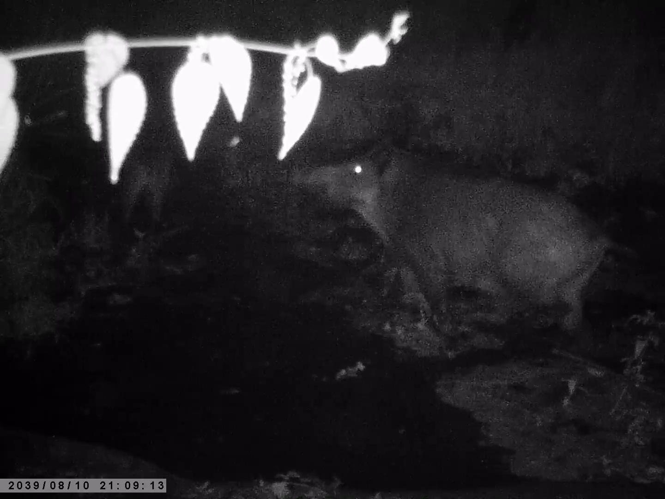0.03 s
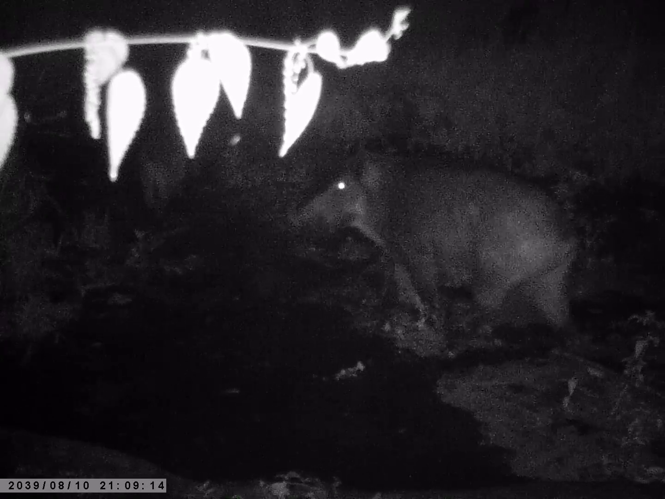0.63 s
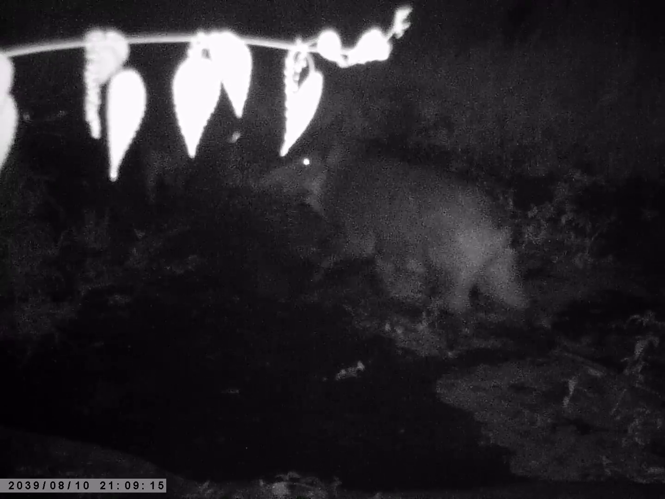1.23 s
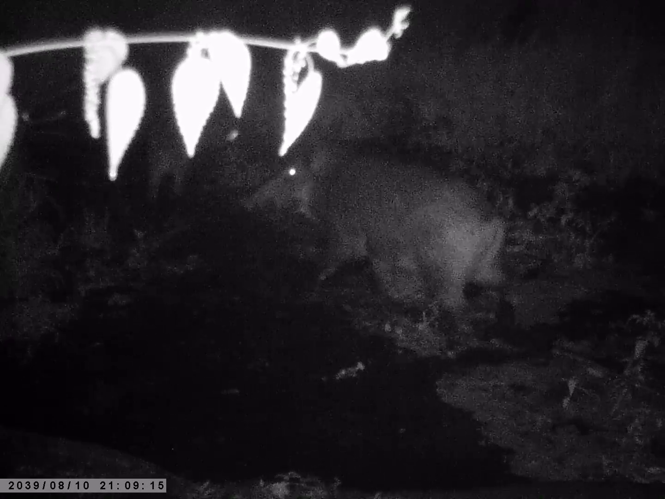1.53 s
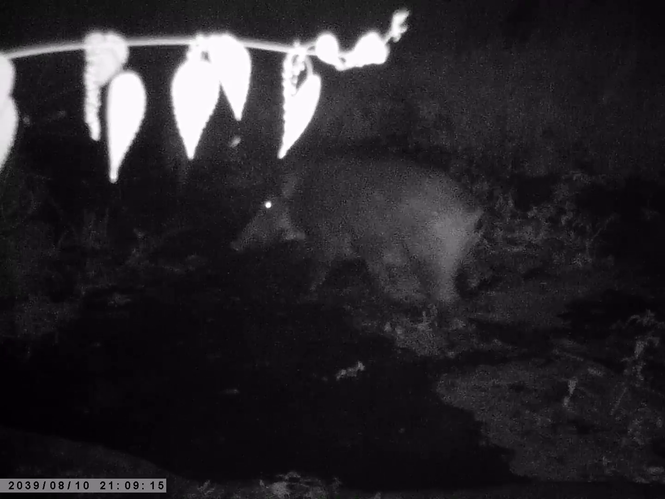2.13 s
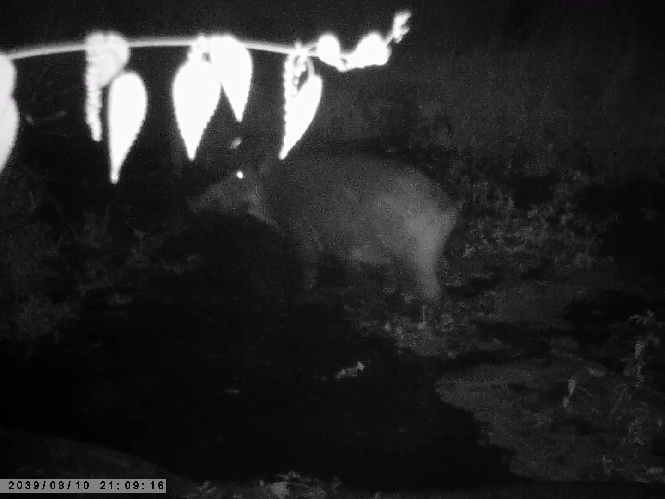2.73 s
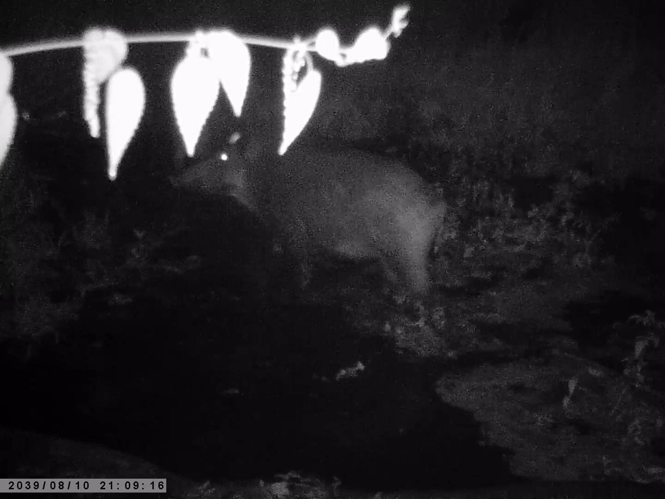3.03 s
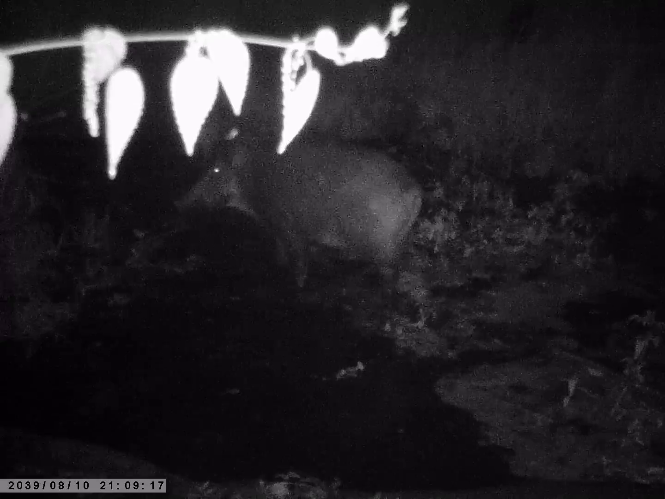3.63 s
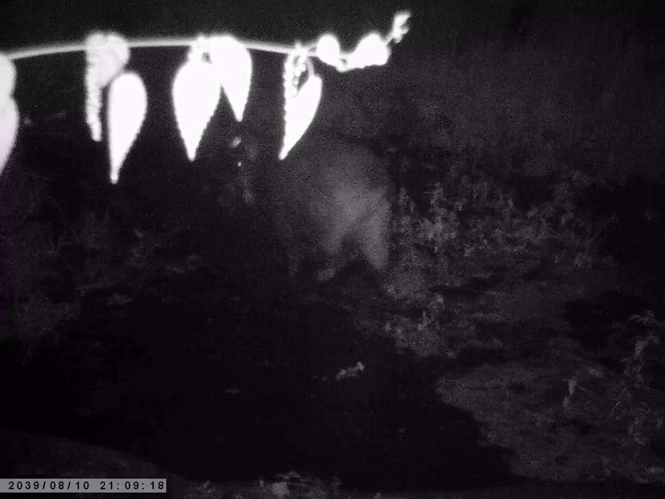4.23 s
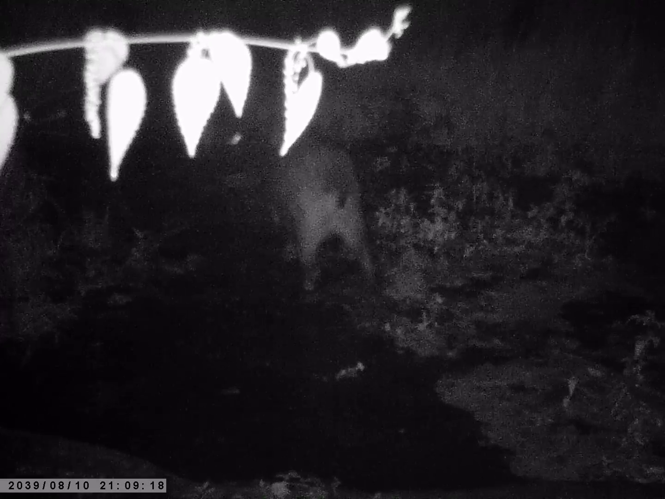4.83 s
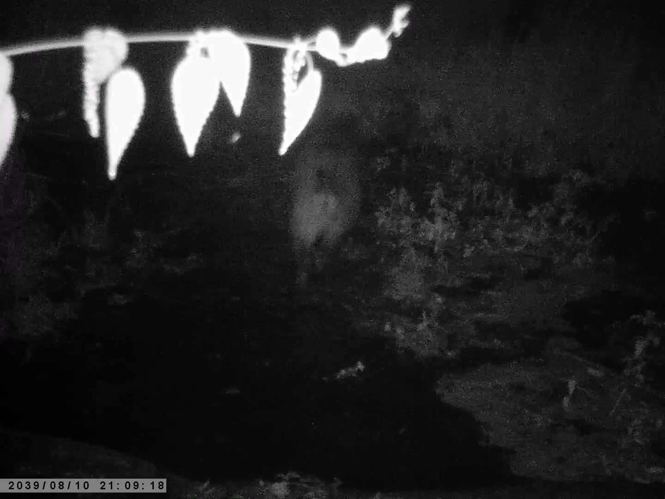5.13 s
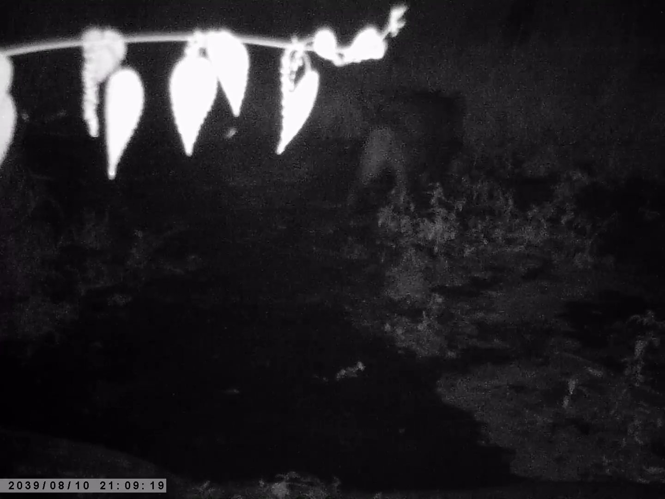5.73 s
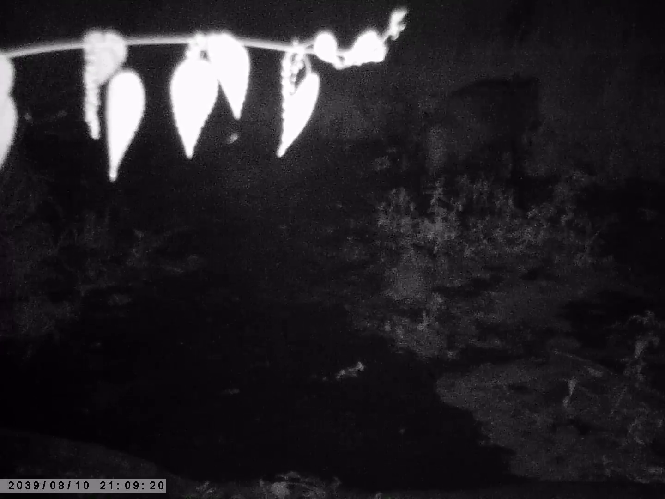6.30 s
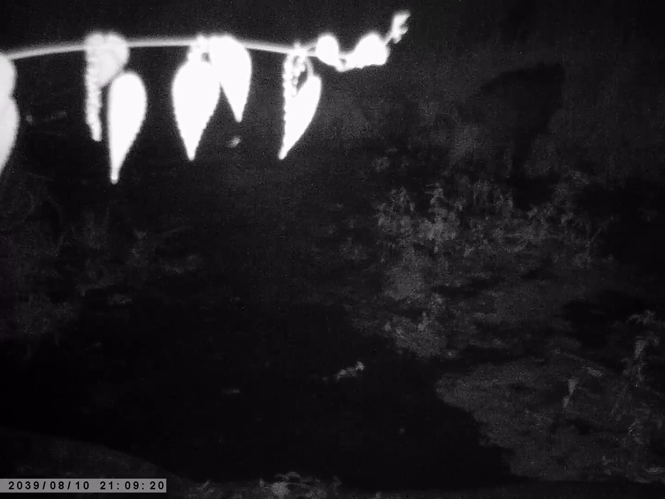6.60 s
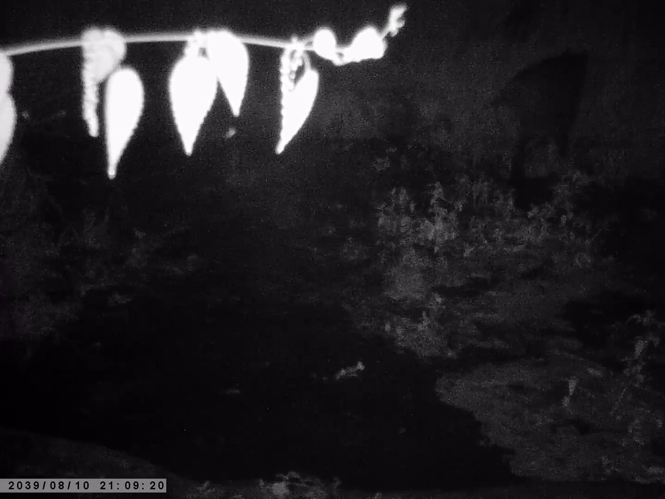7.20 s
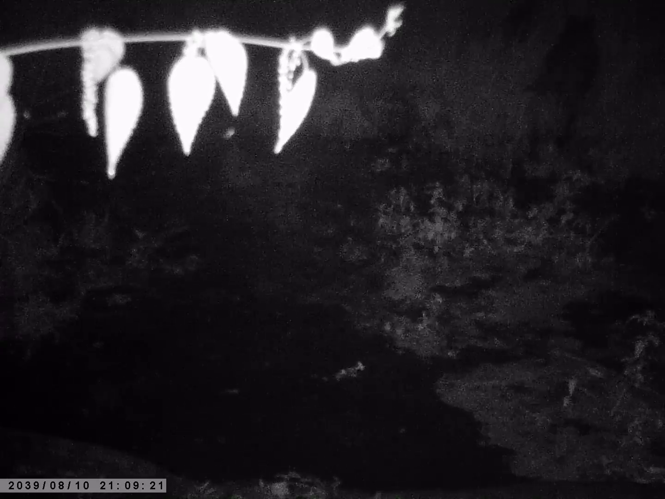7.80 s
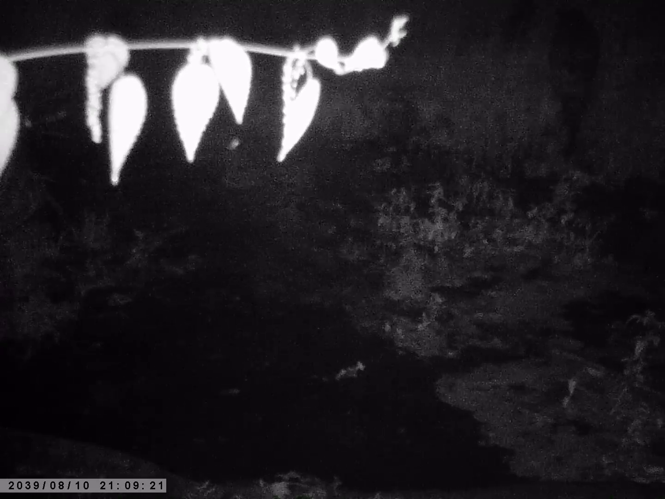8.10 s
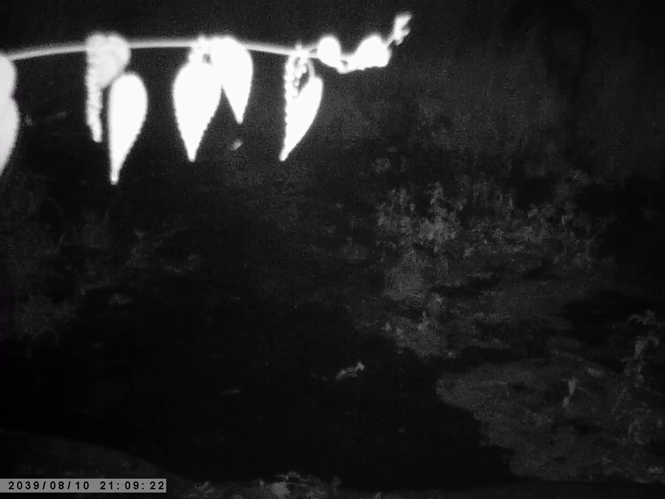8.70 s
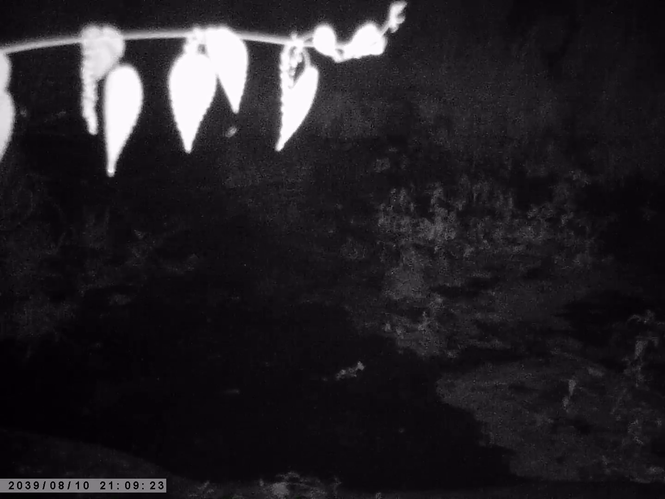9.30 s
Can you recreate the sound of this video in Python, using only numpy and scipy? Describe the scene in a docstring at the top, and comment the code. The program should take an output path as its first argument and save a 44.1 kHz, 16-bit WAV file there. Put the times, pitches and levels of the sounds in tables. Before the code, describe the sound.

A wild boar wades through a shallow marsh at night, some metres away. A faint steady hiss, a low rumble and very high rasping crickets run throughout. At about 0.4 seconds the boar gives one soft, short snort. Until about 5 seconds its hooves squelch irregularly in the mud, with small wet pops, ringing bubbles, drips and an occasional light crack; a dull thud falls near 1.3 seconds. From 5 seconds it hurries, and this is the loudest stretch: a heavy, thudding step at 5.4, quick squelches and sharp cracks of stems and spray until about 7.2, with water churning most around 6. Reeds rustle softly against its body from 5 seconds on. After 7.2 the wet steps weaken, with a thud near 7.9 and a softer one near 8.7, while dry leaves give fine, high swishes until the end at about 9.4 seconds.

```python
"""In a shallow marsh at night, a wild boar wades by some metres away.
Its hooves squelch in the mud and trap air, which rings as bubbles; water drips from its body.
It snorts once, hurries up the bank and pushes off through tall reeds that rustle and crack.
Bush crickets rasp in the grass; a trail camera's hiss and a low rumble lie under everything."""
import sys
import numpy as np
from scipy import signal
from scipy.fft import rfft, irfft, next_fast_len
from scipy.io import wavfile
from scipy.ndimage import uniform_filter1d

SR = 44100
rng = np.random.default_rng(int(sys.argv[2]) if len(sys.argv) > 2 else 0)


def generate_wav(signal):
    """Clip the signal to [-1, 1] and save it as 16-bit WAV at the path in sys.argv[1]."""
    frames = np.transpose(np.atleast_2d(signal))
    scaled = np.clip(frames, -1, 1) * 32767
    pcm = np.round(scaled).astype(np.int16)
    wavfile.write(sys.argv[1], SR, pcm)


N = 412335
TIME = np.arange(N) / SR

# Levels in the tables are relative: the functions add their own gains.
# tone colour of the hiss: f/Hz, level/dB
HISS_COLOUR = [(150, -9), (250, 1), (400, -5.5), (700, -4.5), (1100, -5), (2500, -4), (5000, -12),
               (8000, -44), (12000, -24), (14200, -9), (15300, -33), (15800, -42)]
# tone colour of the rumble: f/Hz, level/dB
RUMBLE_COLOUR = [(15, 0), (30, -6.5), (55, -4.5), (110, -14), (170, -20.5), (250, -26.5), (400, -33.5)]
# how the rumble swells and sinks: t/s, level/dB
RUMBLE_LEVELS = [(0, -51), (.85, -52), (1.2, -48.5), (1.7, -51), (2.2, -50), (4.6, -51), (5.35, -49),
                 (6.25, -46.5), (6.9, -50), (7.6, -49), (8.7, -50), (9.35, -50.5)]
# tone colour of the bush crickets: f/Hz, level/dB
CRICKET_COLOUR = [(6500, -1.5), (8000, 0), (9000, 4), (9700, 8), (10500, 9), (11300, 3), (12300, -3),
                  (14000, -13)]
# how hard the legs stir the water: t/s, level/dB
WADING_LEVELS = [(0, -61), (1.0, -61), (1.6, -59.5), (2.0, -61), (2.6, -61.5), (2.79, -57), (3.04, -61.5),
                 (4.1, -61), (4.75, -62), (5.08, -57.5), (5.55, -53.5), (6.1, -45.5), (6.33, -48),
                 (6.42, -53.5), (6.5, -50), (6.6, -53.5), (7.24, -59.5), (7.85, -60.5), (8.04, -55),
                 (8.4, -62), (9.35, -62)]
# tone colour of small bubbles near the surface: f/Hz, level/dB
CHURN_COLOUR = [(400, -28), (700, -7), (1100, 0), (1800, 4), (2800, 1), (4000, -3), (6000, -18),
                (9000, -48)]
# tone colour of larger bubbles below: f/Hz, level/dB
GURGLE_COLOUR = [(200, -44), (300, -2.5), (420, -2.5), (650, 0), (1000, -3)]
# a leg sweeps through deep water: t/s, level/dB, length/s
LEG_SWEEPS = [(1.19, -76, 0.66), (2.73, -57.5, 0.11), (5.34, -56, 0.29), (5.687, -44, 0.15),
              (6.088, -51.5, 0.22), (7.84, -59, 0.26)]
# the breath of one snort: t/s, level/dB
SNORT_LEVELS = [(.33, -79), (.38, -55.5), (.47, -52), (.51, -55), (.56, -74)]
# tone colour of air in the snout: f/Hz, level/dB
SNOUT_COLOUR = [(150, -18), (300, -7.5), (450, -8.5), (800, -16.5), (1500, -14), (2400, -20.5),
                (3050, -13.5), (4000, -21), (5900, -20.5), (7200, -25), (9000, -33)]
# dry leaves swish on the bank: t/s, level/dB
LEAF_LEVELS = [(6.8, -90), (7.23, -76), (7.28, -58), (7.45, -70), (7.57, -75), (7.63, -58), (7.76, -74),
               (7.95, -67), (8.13, -52), (8.35, -57), (8.4, -68.5), (8.64, -65), (8.7, -55), (8.82, -53),
               (8.9, -62), (8.98, -49), (9.13, -53.5), (9.22, -67), (9.35, -72)]
# how hard reeds brush the boar's sides: t/s, level/dB
REED_LEVELS = [(4.85, -60.5), (5.1, -58.5), (5.25, -60), (5.41, -56.5), (5.61, -57), (5.7, -56),
               (6.0, -56.5), (6.36, -57.5), (6.42, -56), (6.5, -57.5), (6.66, -59), (6.8, -59.5),
               (7.05, -58), (7.22, -60), (7.3, -59), (7.55, -60), (7.8, -60), (8.15, -57.5), (8.36, -57),
               (8.4, -59.5), (8.63, -60), (8.71, -57), (8.81, -57), (8.9, -59), (9.0, -58), (9.14, -58),
               (9.22, -60), (9.35, -59.5)]
# tone colour of sliding reed leaves: f/Hz, level/dB
REED_COLOUR = [(1200, -8), (2500, -0.5), (4000, 2), (6000, 3), (8000, 0.5), (11000, -1), (14000, -13),
               (16000, -28)]
# stems crack and spray bursts: t/s, level/dB, fade time/s
SHARP_CRACKS = [(0.228, -41, .0083), (0.387, -36.5, 0.025), (1.391, -37, .061), (1.902, -39.5, 0.048),
                (1.9247, -33, 0.053), (2.257, -41, .012), (3.387, -35.5, 0.028), (3.436, -39.5, .02),
                (4.512, -40, .04), (4.6047, -39, .02), (5.0577, -31.5, 0.033), (5.1196, -28, .076),
                (5.3608, -23.5, 0.058), (5.498, -24.5, 0.035), (5.511, -33, .06), (5.642, -27, 0.057),
                (5.674, -39, .067), (5.9065, -35, .042), (6.0207, -22.5, 0.052), (6.302, -29, .048),
                (6.4374, -34.5, 0.055), (6.466, -39, 0.035), (6.886, -33, 0.034), (7.1, -24.5, 0.026)]
# dull thuds and soft low bumps, some under the hooves: t/s, level/dB, f/Hz, fade time/s
LOW_THUDS = [(1.24, -50, 216, 0.06), (1.331, -30.5, 92, 0.13), (1.36, -48.5, 306, 0.23),
             (1.44, -40, 126, 0.082), (1.595, -45, 150, .06), (5.325, -39, 113, 0.2),
             (5.362, -22, 123, 0.063), (5.365, -22, 454, 0.052), (5.378, -26, 54.6, 0.16),
             (6.75, -33.5, 230, 0.1), (7.855, -27.5, 138, 0.16), (7.864, -39, 424, 0.12),
             (7.90, -37, 134, 0.14), (8.67, -39, 149, 0.21), (8.668, -47, 325, 0.45),
             (8.74, -52, 297, 0.32)]
# single bubbles ring as hooves squelch and drops fall: t/s, level/dB, starting f/Hz
PLOPS = [(.591, -58, 1110), (.733, -46.5, 1770), (.86, -52, 2400), (.926, -49, 1790), (1.206, -32, 2440),
         (2.002, -53, 2500), (2.276, -45, 1710), (2.527, -49, 2600), (2.68, -44, 3400), (2.722, -43, 2450),
         (2.745, -47, 2400), (2.764, -42, 2400), (2.772, -43, 910), (2.7843, -35, 1215), (2.809, -47, 1210),
         (2.828, -43.5, 4250), (2.879, -43, 1520), (2.896, -50.5, 1700), (2.911, -42, 2370),
         (2.917, -49, 1600), (3.124, -40.5, 3000), (3.295, -48, 2700), (3.34, -39.5, 2740),
         (3.394, -47, 1800), (3.993, -35.5, 2520), (4.054, -50, 1950), (4.145, -51, 1200),
         (4.352, -51.5, 1140), (4.369, -40.5, 1760), (4.372, -36.5, 3270), (4.487, -43, 2000),
         (4.909, -42, 1410), (4.966, -41, 1170), (5.026, -46.5, 940), (5.129, -26.5, 1700),
         (5.328, -31, 1090), (5.386, -30, 1610), (5.449, -43, 1350), (5.518, -39.5, 534),
         (5.563, -28, 2640), (5.678, -30.5, 2800), (5.728, -37, 640), (5.746, -40, 483), (5.766, -28, 814),
         (5.783, -40, 560), (5.817, -40, 950), (5.85, -32, 346), (5.853, -36.5, 1450), (5.88, -39, 1800),
         (5.943, -35, 1850), (5.993, -37, 800), (6.082, -24.5, 1790), (6.132, -38.5, 500),
         (6.178, -36, 1850), (6.157, -36.5, 785), (6.18, -42.5, 412), (6.218, -31.5, 1084),
         (6.261, -36, 1510), (6.286, -30.5, 2400), (6.361, -53, 1330), (6.494, -35, 767), (6.621, -51, 475),
         (6.663, -40, 1810), (6.676, -41.5, 1450), (6.944, -42, 1610), (7.112, -25.5, 4900),
         (7.152, -29, 868), (7.179, -41, 1110), (7.62, -42, 900), (7.626, -33.5, 2410), (7.869, -41, 1980),
         (7.938, -37.5, 2310), (7.972, -43, 770), (8.015, -42.5, 855), (8.085, -36.5, 2150),
         (8.103, -45, 950), (8.164, -39, 1520), (8.187, -41, 2230)]
# short wet pops of mud, hooves and falling drops: t/s, level/dB, f/Hz of the hollow
WET_SMACKS = [(.2295, -35, 3430), (1.0353, -44, 3200), (1.2217, -37, 1600), (1.2392, -32.5, 1060),
              (1.2435, -33, 1720), (1.2478, -39, 1300), (1.5063, -41, 1800), (1.8324, -37.5, 3000),
              (1.8545, -44, 2700), (1.9311, -34, 3340), (2.2578, -34.5, 2740), (2.2765, -40, 2010),
              (2.392, -42, 1310), (2.7133, -32, 1870), (2.7224, -39, 2400), (2.7296, -28.5, 2500),
              (2.757, -44, 1010), (2.7853, -33, 1200), (2.8151, -39, 1700), (2.957, -46, 1290),
              (3.0612, -43, 3420), (3.158, -41, 4500), (3.2488, -41, 2680), (3.283, -38, 3100),
              (3.4352, -37, 3480), (3.4389, -43, 1700), (3.8838, -40, 3400), (4.0524, -40, 2320),
              (4.3724, -34, 3320), (4.5095, -38, 2380), (4.5274, -38, 4200), (4.5802, -47, 2000),
              (4.6061, -35.5, 3300), (4.6204, -43, 2500), (5.122, -22, 3070), (5.3716, -35, 910),
              (5.3886, -22, 1670), (5.4329, -35, 2500), (5.4991, -24, 5000), (5.5133, -26, 5300),
              (5.5645, -26, 3200), (5.5734, -30, 2200), (5.6448, -22, 4900), (5.6485, -24.5, 2600),
              (5.6794, -28, 2860), (6.0145, -26, 1500), (6.0232, -26, 5460), (6.2175, -31, 2780),
              (6.4386, -36, 1290), (6.466, -33, 1690), (6.4758, -17.5, 4040), (6.4978, -23, 2270),
              (6.5599, -23, 3740), (6.6255, -32, 4500), (7.0527, -36, 3720), (7.0746, -32, 1290),
              (7.0953, -26, 2850), (7.0995, -19.5, 3000), (7.1028, -32, 2700), (7.1123, -22, 3370),
              (7.387, -37, 2520), (7.4518, -39, 2500), (7.531, -46.5, 1430), (8.012, -38, 2700),
              (8.0417, -41, 1200), (8.06, -40, 2800), (8.0765, -37, 4000), (8.146, -35, 3500),
              (8.2207, -38.5, 1700)]
# tone colour of pops in closing mud: f/Hz, level/dB
MUD_POP_COLOUR = [(420, 3), (1500, -7), (5200, -6)]
# a hoof sinks in or pulls free: t/s, level/dB, f/Hz of the hollow, rise time/s, fade time/s
HOOF_SQUELCHES = [(.227, -45, 3130, .002, 0.015), (.66, -46.5, 2470, .005, .06),
                  (.715, -45, 2750, .015, 0.044), (1.005, -52, 2980, .005, .05),
                  (1.029, -46, 3320, .005, 0.12), (1.057, -45, 2250, .005, 0.068),
                  (1.106, -42.5, 1830, .005, 0.1), (1.202, -38, 2600, .007, .06),
                  (1.221, -38, 1520, .003, .05), (1.236, -37, 1190, .008, 0.063),
                  (1.26, -46.5, 1800, .003, .15), (1.33, -52, 950, .06, .25), (1.5, -45.5, 1790, .006, .06),
                  (1.545, -48, 2460, .01, .05), (1.596, -44.5, 1820, .006, 0.16),
                  (1.64, -50.5, 2200, .04, .2), (1.816, -41, 1780, .012, 0.056),
                  (1.843, -43, 520, .004, .05), (1.843, -39, 1860, .011, 0.054),
                  (1.922, -34, 3200, .006, .04), (2.257, -46, 2260, .001, .05),
                  (2.275, -43, 2300, .003, 0.064), (2.373, -45, 1300, .006, 0.07),
                  (2.64, -49, 2110, .003, .06), (2.675, -42.5, 2370, .045, 0.099),
                  (2.755, -52.5, 2200, .01, 0.046), (2.77, -43, 1110, 0.011, 0.088),
                  (2.808, -43, 2100, .008, .07), (2.842, -41, 1100, .004, .04),
                  (3.053, -49, 3000, .009, .06), (3.248, -39.5, 2190, .001, 0.07),
                  (3.279, -48, 2820, .004, .07), (3.435, -49, 2220, .003, 0.026),
                  (3.6, -48.5, 2160, .005, 0.27), (3.747, -47.5, 2470, .004, 0.065),
                  (3.883, -46, 2500, .004, 0.063), (3.972, -44, 2270, .018, 0.1),
                  (4.348, -40, 2700, .022, 0.043), (4.462, -46.5, 2600, .011, 0.036),
                  (4.502, -47, 2450, .008, .07), (4.578, -43.5, 1770, .003, 0.032),
                  (4.605, -39, 2600, .002, 0.049), (4.903, -38, 1340, .006, .1),
                  (4.934, -36.5, 1410, .009, 0.099), (5.095, -43, 2380, .01, 0.089),
                  (5.12, -34, 2050, .009, 0.27), (5.293, -29.5, 1500, .034, 0.16),
                  (5.36, -26, 1580, .01, 0.04), (5.379, -25.5, 1850, .008, 0.03),
                  (5.43, -35, 2600, .003, .03), (5.498, -34.5, 2230, .015, 0.23),
                  (5.552, -34.5, 3020, .011, .04), (5.64, -27, 3000, .006, 0.02),
                  (5.668, -30.5, 2870, .012, 0.084), (5.775, -39, 1980, .01, .1),
                  (5.906, -32, 2640, .004, .1), (5.98, -30.5, 2860, .009, 0.14),
                  (6.003, -27, 1740, .014, 0.09), (6.062, -40, 1610, .02, .06),
                  (6.15, -36.5, 1510, .028, 0.089), (6.216, -33, 2000, 0.0032, .06),
                  (6.238, -41, 2500, .006, .06), (6.271, -37, 2480, .017, 0.11),
                  (6.432, -33, 1630, .007, 0.1), (6.462, -28.5, 1910, .006, 0.046),
                  (6.473, -26, 3000, .003, .05), (6.493, -38, 2060, .004, 0.043),
                  (6.61, -36.5, 523, .003, 0.042), (6.737, -37, 1800, .005, .06),
                  (6.771, -36.5, 800, .006, 0.037), (6.813, -35.5, 2420, .022, 0.082),
                  (6.882, -28.5, 2210, .005, .025), (7.072, -37.5, 1490, .004, .07),
                  (7.096, -33, 2900, .007, 0.13), (7.158, -36.5, 2960, .011, .04),
                  (7.358, -36.5, 2200, .029, 0.1), (7.447, -46, 2470, .005, 0.027),
                  (7.577, -44, 2450, .009, 0.048), (7.607, -37.5, 2600, .02, 0.16),
                  (7.866, -38.5, 1930, .015, 0.24), (7.905, -44.5, 2300, .015, .08),
                  (7.991, -42, 1630, .006, .07), (8.072, -41.5, 2300, .016, 0.25),
                  (8.18, -45, 2300, .009, 0.05), (8.571, -38.5, 3000, .002, .025)]


def from_db(db):
    """Turn decibels into a factor to multiply a sound by."""
    return 10 ** (np.asarray(db) / 20)


def rms_one(x):
    """Scale a sound so that its average strength (rms) is 1."""
    return x / np.sqrt(np.mean(x ** 2) + 1e-20)


def in_time(rows):
    """Join (time, level) points with straight lines, giving a level for every sample."""
    times, levels = np.transpose(rows)
    return np.interp(TIME, times, levels)


def at_hz(colour, hz):
    """Look up the gain of a tone colour at a given frequency."""
    f, db = np.transpose(colour)
    return from_db(np.interp(np.log(np.maximum(hz, 1)), np.log(f), db))


def coloured_noise(colour):
    """Steady noise with a given tone colour, falling away beyond the table's ends."""
    size = next_fast_len(N)
    hz = np.arange(size // 2 + 1) * SR / size
    ends = np.minimum(hz / colour[0][0], 1) ** 2 / np.maximum(hz / colour[-1][0], 1) ** 2
    spectrum = rfft(rng.standard_normal(size)) * at_hz(colour, hz) * ends
    return rms_one(irfft(spectrum, size)[:N])


def drift(rate):
    """A random wander around zero that heads for a new value `rate` times a second."""
    return np.interp(TIME * rate, np.arange(N), rng.standard_normal(N))


def band(x, low_hz, high_hz, order=2):
    """Keep what lies between two frequencies; a higher order gives sharper edges."""
    edges = np.clip([low_hz, high_hz], [10, 20], [.4 * SR, .45 * SR])
    return signal.sosfilt(signal.butter(order, edges, "band", fs=SR, output="sos"), x)


def ring(clicks, hz, t60):
    """Each click starts a tone that fades by 60 dB in t60 seconds (the fade time)."""
    decay, angle = from_db(-60 / (t60 * SR)), 2 * np.pi * hz / SR
    return signal.lfilter([0, np.sin(angle)], [1, -2 * decay * np.cos(angle), decay ** 2], clicks + 1e-18)


def grains(per_s, spread_db):
    """Random clicks; a positive spread makes a few much louder, a negative one a few much softer."""
    sizes = from_db(spread_db * np.minimum(rng.exponential(1, N), 4)) * rng.choice([-1, 1], N)
    return sizes * (rng.random(N) < per_s / SR)


def fade(t, t60, attack_s):
    """A loudness shape (envelope) that starts quickly and dies away."""
    return (1 - np.exp(-t / attack_s)) * np.exp(-np.log(1000) * t / t60)


def swell(t, rise_s, t60):
    """A loudness shape that climbs evenly to 1, then dies away."""
    return np.minimum(t / rise_s, 1) * np.exp(-np.log(1000) * np.maximum(t - rise_s, 0) / t60)


def add(out, s, sound):
    """Mix a sound in, starting at s seconds."""
    start = max(round(s * SR), 0)
    out[start:start + len(sound)] += sound[:max(N - start, 0)]


def burst(texture, s, low_hz, high_hz, envelope, order=2):
    """A filtered piece of a longer sound, given the shape and energy of an envelope."""
    piece = texture[round(s * SR):][:len(envelope)]
    envelope = envelope[:len(piece)]
    return rms_one(band(piece, low_hz, high_hz, order) * envelope) * np.sqrt(np.mean(envelope ** 2))


def hiss(level_db=-71.5):
    """The camera hisses faintly and steadily."""
    return from_db(level_db) * coloured_noise(HISS_COLOUR)


def rumble(bump_db=-36, bump_width_s=0.0086):
    """A low rumble swells as the boar hurries, dotted with soft bumps at random."""
    t = TIME[:SR // 10] - .05
    bump = np.hanning(len(t)) / (1 + (t / bump_width_s) ** 2)
    bumps = signal.fftconvolve(grains(per_s=5, spread_db=-1.9), bump, "same")
    level_db = in_time(RUMBLE_LEVELS) + 3.7 * drift(rate=16)
    return from_db(level_db) * coloured_noise(RUMBLE_COLOUR) + from_db(bump_db) * bumps


def crickets(chorus_db=-60.5, singer_db=-64.5, chirps_per_s=9.51):
    """A far chorus rasps at a very high pitch; one nearer singer pulses out of it."""
    rasp_db, scrape_db = 2.0 * drift(rate=50), 3.5 * drift(rate=130)
    chorus = coloured_noise(CRICKET_COLOUR) * from_db(chorus_db + rasp_db)
    wingbeat = np.sin(np.pi * (chirps_per_s * TIME + 0.039)) ** 2
    singer = coloured_noise(CRICKET_COLOUR) * rms_one(wingbeat) * from_db(singer_db + scrape_db)
    return chorus + singer


def thicket_echo(x, t60=0.092):
    """The bank and the stems scatter a short, dull echo."""
    t = TIME[:SR // 2]
    echo = band(rng.standard_normal(len(t)), 230, 9200, order=1) * fade(t, t60, attack_s=0.0034)
    return signal.fftconvolve(x, echo / np.linalg.norm(echo))[:N]


def mud_crackle(level_db=-72):
    """Trodden mud keeps crackling finely, easing a little at the very end."""
    easing = np.clip(10 - TIME, 0, 1)
    crackle = rms_one(band(grains(per_s=260, spread_db=-2), 2300, 6600))
    return easing * from_db(level_db + 3.9 * drift(rate=9)) * crackle


def bubble(hz, cycles=17.8, rise_octaves=0.15, attack_s=0.00081, tail_db=-15, fizz_db=-14):
    """One bubble fizzes, rings, climbs in pitch as it nears the surface and lingers softly."""
    t, t60 = TIME[:SR // 8], cycles / hz
    pitch = hz * 2 ** (rise_octaves * (1 - np.exp(-2 * t / t60)))
    tone = np.sin(2 * np.pi * np.cumsum(pitch) / SR)
    tail = from_db(tail_db) * fade(t, 3.6 * t60, attack_s)
    envelope = (fade(t, t60, attack_s) + tail) * (1 - t / t[-1])
    fizz_shape = fade(t, t60=0.045, attack_s=0.002)
    fizz = burst(rng.standard_normal(len(t)), 0, hz / 1.2, hz * 1.32, fizz_shape, order=3)
    return envelope / envelope.max() * tone + from_db(fizz_db) * fizz


def smack(hz, band_ratio=1.59, cycles=12, hollow_db=-3, spray_db=-16):
    """One short push of air sets a hollow ringing and throws a wisp of spray."""
    t = TIME[:SR // 20]
    pulse = band(signal.unit_impulse(len(t)), hz / band_ratio, hz * band_ratio, order=3)
    hollow = ring(pulse, hz, cycles / hz)
    body = pulse / np.abs(pulse).max() + from_db(hollow_db) * hollow / np.abs(hollow).max()
    spray_shape = fade(t, t60=0.026, attack_s=0.0011)
    spray = burst(rng.standard_normal(len(t)), 0, hz / 2.7, hz * 2.35, spray_shape, order=3)
    return body / np.abs(body).max() + from_db(spray_db) * spray


def drips(per_s=9, level_db=-55, spread_db=3.5, middle_hz=2600, scatter_octaves=0.48):
    """Drops fall from belly and legs at random; by turns they smack on mud or trap a bubble."""
    out = np.zeros(N)
    for k, s in enumerate(TIME[rng.random(N) < per_s / SR]):
        size, pitch = np.clip(rng.standard_normal(2), -2, 2)
        hz = middle_hz * 2 ** (scatter_octaves * pitch)
        drop = bubble(hz) if k % 2 else from_db(1) * smack(hz)
        add(out, s, from_db(level_db + spread_db * size) * drop)
    return out


def bubbling(colour, per_s, cycles, spread_db):
    """An evenly loud swarm of bubbles, each swelling and ringing briefly at its own pitch."""
    pitches = np.geomspace(colour[0][0], colour[-1][0], num=26)
    clicks, pitch_index = grains(per_s, spread_db), rng.integers(0, len(pitches), N)
    swarm = 0
    for k, hz in enumerate(pitches):
        onset = ring(clicks * (pitch_index == k), hz, .5 * cycles / hz)  # ringing twice softens the start
        swarm = swarm + ring(onset, hz, cycles / hz) * hz ** 2 * at_hz(colour, hz)
    swarm = rms_one(swarm)
    local_power = np.abs(uniform_filter1d(swarm ** 2, size=SR // 10))
    return swarm / np.sqrt(local_power + 1e-3)


def above_rest(db, rest_db):
    """The gain of a movement that falls silent as its level sinks to rest_db."""
    return np.sqrt(np.maximum(from_db(db) ** 2 - from_db(rest_db) ** 2, 0))


def stirred_water():
    """Legs churn small bubbles on top and larger ones below, which surge at each sweep; spray patters."""
    churn_db = in_time(WADING_LEVELS)
    small = bubbling(CHURN_COLOUR, per_s=2400, cycles=17.5, spread_db=4.5)
    spray = from_db(-11) * rms_one(band(grains(per_s=410, spread_db=3), 2240, 4000))
    large = bubbling(GURGLE_COLOUR, per_s=450, cycles=6.8, spread_db=4.5)
    surges = sum(from_db(db) * np.sin(np.pi * np.clip((TIME - s) / length, 0, 1))
                 for s, db, length in LEG_SWEEPS)
    undertow = above_rest(np.minimum(churn_db - 5.5, -64.5), rest_db=-69.5)  # follows the legs, capped
    surface = from_db(0.15) * above_rest(churn_db, rest_db=-62) * (small + spray)
    return surface + from_db(-1.5) * (surges + undertow) * large


def snort():
    """Air flutters through the snout."""
    return from_db(in_time(SNORT_LEVELS) + 3.2 * drift(rate=130)) * coloured_noise(SNOUT_COLOUR)


def dry_leaves(flutter_db=1):
    """Dry leaves swish high and fine as the boar pushes up the bank."""
    level_db = in_time(LEAF_LEVELS) + flutter_db * drift(rate=70)
    return from_db(level_db) * rms_one(band(grains(per_s=5600, spread_db=-1), 6600, 15400))


def reeds():
    """Leaves hiss as they slide over bristles; stems crackle and thick stalks give a duller rub."""
    sliding = coloured_noise(REED_COLOUR) * from_db(3.2 * drift(rate=90))
    crackle = rms_one(band(grains(per_s=1800, spread_db=4.5), 2600, 14000, order=1))
    stalks = rms_one(band(grains(per_s=2000, spread_db=3.5), 550, 2600))
    brushing = above_rest(in_time(REED_LEVELS), rest_db=-60)
    return brushing * (from_db(7.5) * sliding + from_db(1) * crackle + from_db(-3) * stalks)


def cracks(snap_db=-4, volley_db=-5):
    """A stem breaks or spray bursts: one hard snap inside a bright volley of tiny clicks."""
    out, t = np.zeros(N), TIME[:SR // 3]
    clicks, noise = grains(per_s=3700, spread_db=4.5), rng.standard_normal(N)
    for s, db, t60 in SHARP_CRACKS:
        snap = burst(noise, s, 2100, 10200, fade(t, t60=0.015, attack_s=0.00045), order=1)
        volley = burst(clicks, s, 4500, 8700, fade(t, t60, attack_s=0.0034), order=1)
        add(out, s + 0.00111, from_db(db + snap_db) * snap)
        add(out, s, from_db(db + volley_db) * volley)
    return out


def thuds(gain_db=-5, band_ratio=1.316):
    """Short bursts of low noise make dull thuds and soft bumps, some under the hooves."""
    out, noise = np.zeros(N), rng.standard_normal(N)
    for s, db, hz, t60 in LOW_THUDS:
        envelope = fade(TIME[:SR // 3], t60, attack_s=0.012)
        thud = burst(noise, s, hz / band_ratio, hz * band_ratio, envelope, order=3)
        add(out, s, from_db(db + gain_db) * thud)
    return out


def plops():
    """Single bubbles ring as hooves squelch and drops fall."""
    out = np.zeros(N)
    for s, db, hz in PLOPS:
        add(out, s, from_db(db) * bubble(hz))
    return out


def trapped_air(count=3, gap_s=0.037, gain_db=-16.5, loss_db=1, scatter_octaves=0.49):
    """Each squelch sheds bubbles: one just below its hollow's pitch, then weaker, scattered ones."""
    out = np.zeros(N)
    for s, db, hz, rise_s, _ in HOOF_SQUELCHES:
        for k in range(count):
            delay = rise_s + k * gap_s * rng.uniform(0.54, 1.3)
            octaves = min(k, 1) * scatter_octaves * rng.standard_normal()
            pitch = 0.863 * hz * 2 ** octaves
            add(out, s + delay, from_db(db + gain_db - k * loss_db) * bubble(pitch))
    return out


def smacks(gain_db=-3):
    """Short wet pops of mud, hooves and falling drops stand out of the squelching."""
    out = np.zeros(N)
    for s, db, hz in WET_SMACKS:
        add(out, s, from_db(db + gain_db) * smack(hz))
    return out


def squelches(suck_db=-13.5, pop_db=-9.5, spatter_db=-15, usual_step_db=-35):
    """Mud sucks at a hoof and closes in a cluster of pops; harder steps are broader and spatter more."""
    out, t = np.zeros(N), TIME[:SR // 3]
    pops = bubbling(MUD_POP_COLOUR, per_s=2400, cycles=10.7, spread_db=0.5)
    suction, drops = grains(per_s=2400, spread_db=2.5), grains(per_s=2200, spread_db=3)
    for s, db, hz, rise_s, t60 in HOOF_SQUELCHES:
        envelope, harder_db = swell(t, rise_s, t60), db - usual_step_db
        band_ratio = 2 ** max(0.76 + 0.03 * harder_db, .2)
        low_hz, high_hz = hz / band_ratio, hz * band_ratio
        add(out, s, from_db(db + suck_db) * burst(suction, s, low_hz, high_hz, envelope))
        add(out, s, from_db(db + pop_db) * burst(pops, s, low_hz, high_hz, envelope, order=3))
        spatter = burst(drops, s, hz / 5.3, hz * 4.3, swell(t, rise_s, 2 * t60))
        add(out, s, from_db(db + spatter_db + 0.074 * harder_db) * spatter)
    return out


def scene(echo_db=-15):
    """The night background, the boar and its echo, in one channel."""
    background = hiss() + crickets() + rumble()
    boar = stirred_water() + squelches() + smacks() + cracks() + thuds() + reeds() + dry_leaves()
    boar += snort() + plops() + trapped_air() + drips() + mud_crackle()
    return (background + boar + from_db(echo_db) * thicket_echo(boar))[None]


def record(dry):
    """Cut the highest treble off steeply."""
    cutoff_hz = 15800
    return signal.sosfilt(signal.ellip(10, .2, 80, cutoff_hz, fs=SR, output="sos"), dry)


dry = scene()
out = record(dry)
generate_wav(out)
```